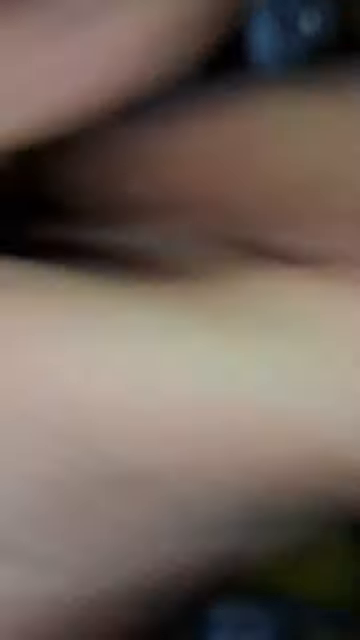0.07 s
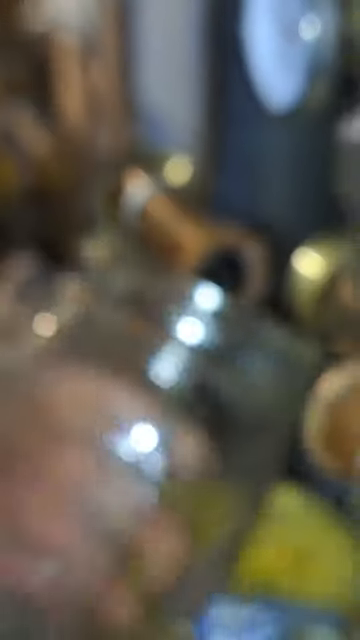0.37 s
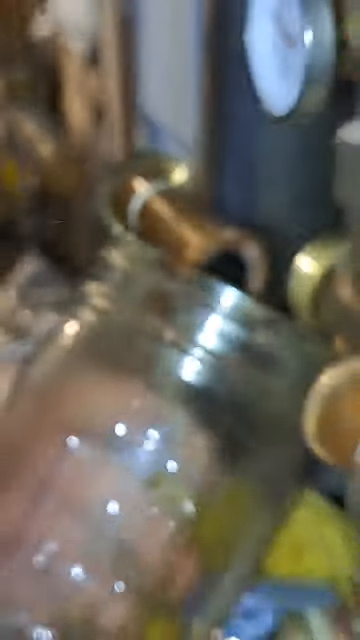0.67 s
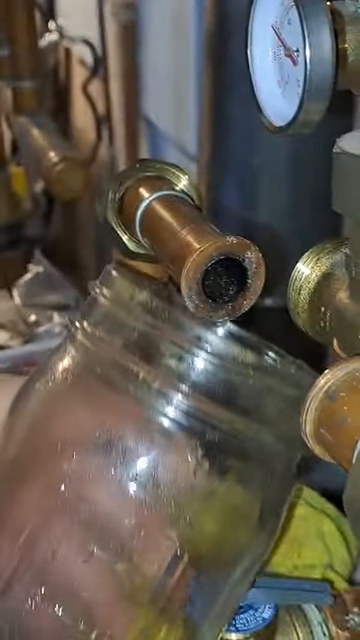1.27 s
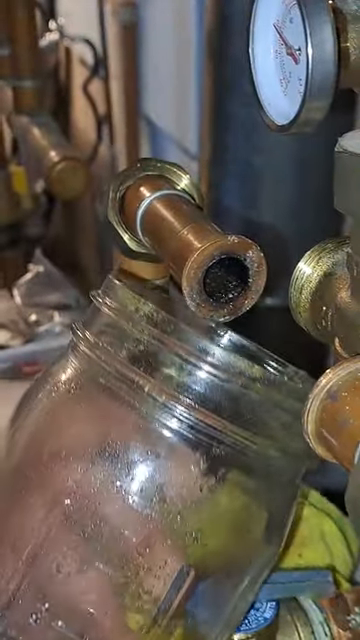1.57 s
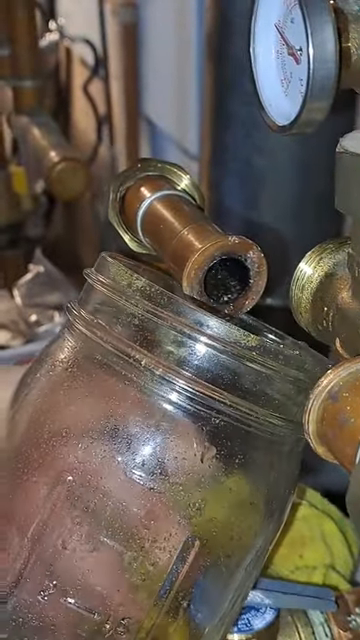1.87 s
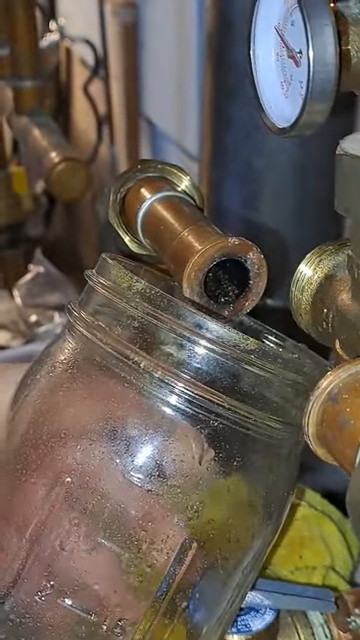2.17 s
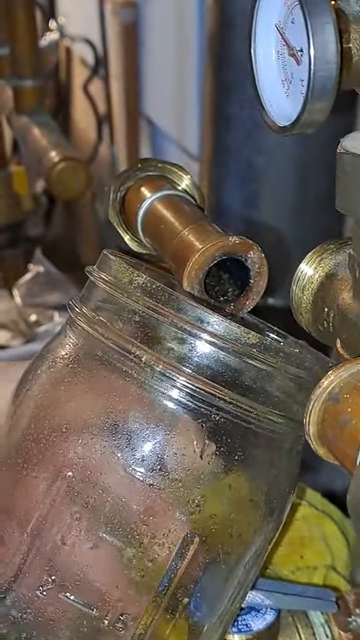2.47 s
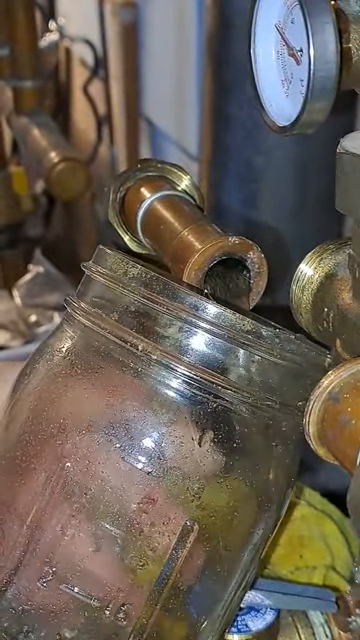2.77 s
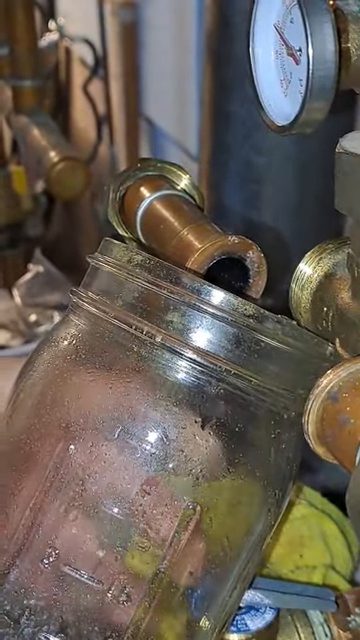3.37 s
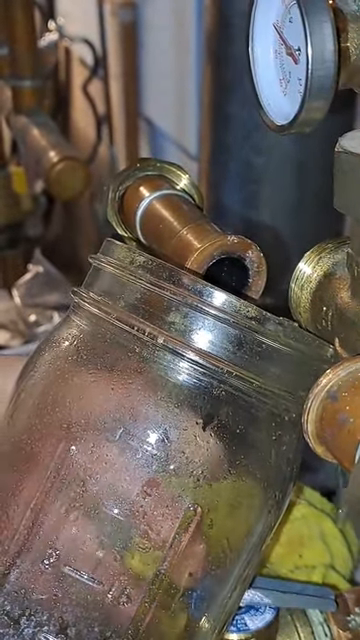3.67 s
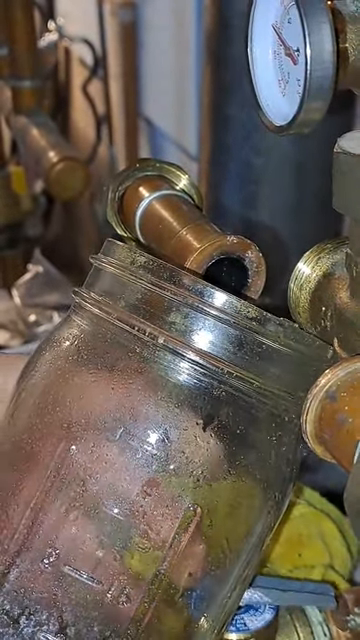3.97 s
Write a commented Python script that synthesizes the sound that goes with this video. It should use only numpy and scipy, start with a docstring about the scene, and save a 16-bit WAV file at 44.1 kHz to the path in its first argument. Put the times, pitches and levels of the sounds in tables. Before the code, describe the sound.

A glass jar knocks against fittings, then a pipe sputters air and water into it.

```python
"""A hand-held glass jar knocks and ticks against pipe fittings, on a stereo pair in a small humming room.
After about two seconds, air and water spit into it from an open copper pipe. A spurt starts as a hiss,
then gurgles as slugs of water close and open the pipe's mouth. The first dies away in a sputter and
a few drops; another breaks out just at the end."""
import sys
import numpy as np
from scipy import signal
from scipy.fft import rfft, irfft
from scipy.io import wavfile

SR = 44100
rng = np.random.default_rng(int(sys.argv[2]) if len(sys.argv) > 2 else 0)


def inscribe(sig):
    """Save sig as 16-bit PCM at rate SR to the path in sys.argv[1].

    A 1-D sig is mono; a 2-D sig holds one channel per row.
    Samples are clipped to [-1, 1] before scaling.
    """
    pcm = np.round(np.clip(np.atleast_2d(sig).T, -1, 1) * 32767)
    wavfile.write(sys.argv[1], SR, pcm.astype(np.int16))


N = 176400
T = np.arange(N) / SR
HZ = np.fft.rfftfreq(N, 1 / SR) + 1

# slugs of water bursting at the pipe's mouth: start_s, length_s, level_db, pocket_from_hz, pocket_to_hz
WATER_SLUGS = [(2.241, 0.016, -39.5, 2890, 2190), (2.275, 0.075, -43, 1630, 1580),
               (2.333, 0.029, -30.5, 1300, 905), (2.397, 0.036, -31.5, 1003, 1230),
               (2.471, 0.025, -31.5, 880, 1620), (2.493, 0.078, -32.5, 1630, 1540),
               (2.755, 0.085, -56, 1604, 1493), (2.874, 0.024, -49, 806, 1250),
               (3.912, 0.018, -29.5, 1100, 1090), (3.961, 0.016, -20.5, 2100, 1670),
               (3.992, .03, -31, 1090, 1000)]
# spurts of air and water: start_s, length_s, hiss_db, churn_db, whistle_re_hiss_db, crackle_depth_db
PIPE_SPURTS = [(2.252, .32, -39.5, -36, -9, 14), (2.76, 0.12, -45, -49.5, -17, 3.5),
               (3.894, 0.03, -28.5, -24.5, -10.5, 6)]
# whistling resonances of the pipe: pitch_hz, width_hz, gain_db
PIPE_WHISTLES = [(5870, 230, -10), (7780, 300, 1.5), (13550, 450, -1.5)]
# tone of the splash, the escaping air and the churning water: frequency_hz, gain_db
SPLASH_SPECTRUM = [(330, -14.5), (850, -2), (1200, 11.5), (1880, -4.5), (2700, -1.5), (9000, -39)]
HISS_SPECTRUM = [(900, -5), (2600, -4), (5500, -7.5), (9000, -13.5), (15000, -5.5)]
CHURN_SPECTRUM = [(30, -42), (63, -7), (148, -1), (330, -8.5), (800, -32)]
# puffs, seeping air and soft sloshes at the mouth: start_s, length_s, level_db, centre_hz
MOUTH_PUFFS = [(0, 1, -62, 10300), (1.13, 0.74, -65.5, 5500), (2.2, 0.14, -39.5, 10600),
               (2.239, 0.035, -19, 4440), (2.79, 0.23, -45.5, 415), (3.05, 0.84, -68.5, 4900),
               (3.876, 0.27, -30, 2620), (3.922, 0.15, -29, 370)]
# drops landing on the glass: start_s, level_db, pitch_hz
WATER_DROPS = [(2.802, -48, 4040), (2.839, -39, 3480), (2.874, -37, 5390), (2.909, -29, 3180),
               (2.927, -42, 5990), (2.957, -39, 3580), (3.0, -38, 3440)]
# jar against the pipework: start_s, boom_db, body_db, clack_db, ring_db
JAR_KNOCKS = [(0.056, -58, -34, -36.5, -47), (0.67, -50.5, -37, -32.5, -49), (0.960, -35, -33, -31.5, -40),
              (0.973, -34.5, -33.5, -27, -52), (1.886, -54.5, -49, -45.5, -72.5),
              (3.185, -42, -54, -49, -65)]
# boom, body, clack and ring of a knock: low_hz, high_hz, rise_s, hard_rattle_t60_s, mode_share
KNOCK_PARTS = [(69, 406, 0.021, 0.56, 0.65), (295, 900, 0.016, 0.37, 0.61), (910, 2160, 0.00067, 0.32, 0.9),
               (2500, 10300, 0.00085, 0.32, 0.61)]
# modes of the glass: pitch_hz, gain_db, t60_s
JAR_MODES = [(507, 6.5, 0.18), (789, 1, 0.26), (1556, 4, 0.042), (1988, 8, 0.066), (4090, -3, 0.33),
             (4974, -4.5, 0.37), (6880, 1.5, 0.12), (7590, 3.5, 0.11)]
# ticks of glass and fittings: start_s, level_db, centre_hz
GLASS_TICKS = [(0.201, -36.5, 4760), (0.244, -37, 3080), (0.734, -45, 4200), (0.82, -52, 3570),
               (1.679, -49, 4970), (3.03, -46, 12400), (3.678, -57.5, 4560)]
# soft bumps of the hand: start_s, level_db
HAND_BUMPS = [(0.983, -33.5), (1.723, -49), (2.75, -40), (3.679, -43)]
# the hand shifting its grip: start_s, length_s, level_db, centre_hz
GRIP_RUBS = [(0, 0.6, -53, 122), (0.19, 0.28, -47, 462), (1.101, 0.48, -51, 131.4),
             (3.528, 0.36, -54.5, 132)]
# room tone: frequency_hz, gain_db
ROOM_SPECTRUM = [(30, -3), (70, 0.5), (550, -8), (1000, -3.5), (1950, -2), (2450, -21), (7650, -29),
                 (15500, -30.5)]
# how the sounds at the jar sit between the microphones: frequency_hz, left_minus_right_db
MIC_BALANCE = [(800, 2), (2700, -1.5), (6400, -6), (10000, -1)]

MICS_APART_HZ = 880  # above this the two microphones hear mostly unrelated noise


def gurgle():
    """Each slug splashes, sheds bubbles and rings an air pocket that glides as it opens or closes."""
    powers = np.array([amp(db) * surge(start, length, rise=0.012, t60=0.077)
                       for start, length, db, _, _ in WATER_SLUGS]) ** 2 + 1e-30
    glides = [np.interp(T, [start, start + length], [from_hz, to_hz])
              for start, length, _, from_hz, to_hz in WATER_SLUGS]
    pocket_hz = np.average(glides, axis=0, weights=powers)
    bursts = flutter(rate_hz=120, depth_db=5)
    pocket = resonate(white() * bursts, pocket_hz, width_hz=210)
    splash = shaped(white() * bursts, amp(curve(SPLASH_SPECTRUM)))
    return np.sqrt(powers.sum(0)) * (pocket + amp(-4) * splash + amp(-3) * bubbles())


def bubbles(sizes=24, per_s=450, decay_cycles=8, glide=.05):
    """Bubbles of many sizes, torn off by the slugs, each rise in pitch as they die."""
    out = np.zeros(N)
    for hz in np.geomspace(560, 1750, sizes):
        age = hz * T[:SR // 20] / decay_cycles
        ring = np.sin(2 * np.pi * decay_cycles * age * (1 + glide * age)) * np.exp(-age)
        births = white() * (rng.random(N) < per_s / sizes / SR)
        out += signal.oaconvolve(births, ring)[:N]
    return unit_rms(out)


def hiss():
    """Escaping air whistles unsteadily in the pipe and crackles with spray."""
    gusts = flutter(rate_hz=45, depth_db=2)
    bend = gusts ** 0.022  # stronger gusts whistle slightly higher
    whistles = gusts * sum(amp(db) * resonate(white(), hz * bend, width)
                           for hz, width, db in PIPE_WHISTLES)
    out = np.zeros(N)
    for start, length, db, _, whistle_db, crackle_db in PIPE_SPURTS:
        spray = shaped(white() * flutter(rate_hz=170, depth_db=crackle_db), amp(curve(HISS_SPECTRUM)))
        level = amp(db) * surge(start, length, rise=0.0245, t60=0.41)
        out += level * (spray + amp(whistle_db) * whistles)
    return out


def churn(lag_s=0.076):
    """The low churning of water follows each spurt a moment later."""
    level = sum(amp(db) * surge(start + lag_s, length - lag_s, rise=0.049, t60=0.4)
                for start, length, _, db, _, _ in PIPE_SPURTS)
    return level * shaped(stereo_noise(), amp(curve(CHURN_SPECTRUM)))


def drops():
    """A drop slaps the glass and rings briefly."""
    out = np.zeros((2, N))
    for start, db, hz in WATER_DROPS:
        slap = amp(-3) * noise_band(hz, octaves=.7)
        add(out, start, amp(db) * (tone(hz) + slap) * strike(T, rise=0.001, t60=0.027))
    return out


def knocks(hard_boom_db=-33.5, trim_db=0.5):
    """Each knock rings the jar's modes over a dense rattle of pipework; the low parts swell later."""
    out, t = np.zeros((2, N)), T[:SR // 2]
    for part, (low, high, rise, t60, mode_share) in enumerate(KNOCK_PARTS):
        pipework = shaped(stereo_noise(), 1 / (1 + (low / HZ) ** 6) / (1 + (HZ / high) ** 6))
        modes = [mode for mode in JAR_MODES if low < mode[0] < high]
        for start, *levels_db in JAR_KNOCKS:
            ring = glass_ring(t, modes, rise)
            stretch = amp(.17 * (levels_db[0] - hard_boom_db))  # softer knocks rattle for less long
            rattle = np.roll(pipework, rng.integers(N), 1)[:, :len(t)] * strike(t, rise, t60 * stretch)
            knock = np.sqrt(mode_share) * ring + np.sqrt(1 - mode_share) * rattle
            add(out, start, amp(levels_db[part] + trim_db) * knock)
    return out


def glass_ring(t, modes, rise):
    """The struck jar's modes die away, each reaching the two microphones at different phases."""
    total_rms = np.sqrt(sum(amp(db) ** 2 for _, db, _ in modes) / 2)
    out = np.zeros((2, len(t)))
    for hz, db, t60 in modes:
        cycles = hz * t + rng.random()
        mic_offset = rng.random((2, 1)) * min(hz / MICS_APART_HZ / 2, 1)
        out += amp(db) / total_rms * strike(t, rise, t60) * np.sin(2 * np.pi * (cycles + mic_offset))
    return out


def ticks(octaves=0.92):
    """Short bright cracks of glass on metal, each with a duller body and the ping of a fitting."""
    out = np.zeros((2, N))
    ping = amp(-54.5) * tone(hz=3500) * strike(T, rise=0.003, t60=0.035)
    for start, db, hz in GLASS_TICKS:
        crack = noise_band(hz, octaves) + .5 * noise_band(hz / 2, octaves)
        add(out, start, amp(db) * crack * strike(T, rise=0.0034, t60=0.041) + ping)
    return out


def handling(bump_hz=65.2):
    """Dull bumps and soft rubbing, from the hand that holds the jar."""
    out = swishes(GRIP_RUBS, octaves=0.56)
    for start, db in HAND_BUMPS:
        thud = tone(bump_hz) + .5 * noise_band(2 * bump_hz, octaves=0.27)
        add(out, start, amp(db) * thud * strike(T, rise=0.016, t60=0.38))
    return out


def room_tone():
    """Steady machine hum behind everything: a broad rush and one narrow band."""
    rush = amp(-61.5) * shaped(stereo_noise(), amp(curve(ROOM_SPECTRUM)))
    return rush + amp(-71) * resonate(stereo_noise(), hz=1004, width_hz=45)


def room(x, wet_db):
    """The near, hard walls add a short tail to the direct sound."""
    return x + amp(wet_db) * echoes(x, t60=.24)


def echoes(x, t60):
    """Dense reflections, a different pattern at each microphone."""
    tail = (stereo_noise() * strike(T, 1 / SR, t60))[:, :SR // 2]
    return signal.fftconvolve(np.atleast_2d(x), tail / np.linalg.norm(tail[0]), axes=1)[:, :N]


def swishes(rows, octaves):
    """Soft strokes of noise that swell quickly and fade."""
    out = np.zeros((2, N))
    for start, length, db, hz in rows:
        envelope = np.minimum(T / 0.022, 1) ** 2 * np.clip(1 - T / length, 0, 1)
        add(out, start, amp(db) * noise_band(hz, octaves) * envelope)
    return out


def stereo_noise():
    """White noise at two microphones: alike in the bass, unrelated in the treble."""
    a, b = rfft(rng.standard_normal((2, N)))
    coherence = 0.94 / (1 + (HZ / MICS_APART_HZ) ** 2)
    mid, side = a * np.sqrt(1 + coherence), b * np.sqrt(1 - coherence)
    return unit_rms(irfft([mid + side, mid - side], N))


def white():
    """Noise from a single point."""
    return rng.standard_normal(N)


def tone(hz):
    """A steady sine."""
    return np.sin(2 * np.pi * hz * T)


def noise_band(hz, octaves):
    """Stereo noise in a bell-shaped band."""
    return shaped(stereo_noise(), np.exp(-.5 * (np.log2(HZ / hz) / octaves) ** 2))


def flutter(rate_hz, depth_db):
    """A randomly wavering gain with its peaks capped."""
    wander = shaped(white(), np.exp(-(HZ / rate_hz) ** 2))
    return unit_rms(amp(depth_db * np.minimum(wander, 2)))


def resonate(x, hz, width_hz):
    """A steep resonance that follows a pitch."""
    carrier = np.exp(2j * np.pi * np.cumsum(hz * np.ones(N)) / SR)
    pole = np.exp(-np.pi * width_hz / SR)
    return unit_rms((carrier * signal.lfilter([1], [1, -2 * pole, pole * pole], x / carrier)).real)


def strike(t, rise, t60):
    """An envelope that rises to 1 and dies away; times in seconds."""
    return np.minimum(t / rise, 1) * np.exp(-np.log(1000) * np.maximum(t - rise, 0) / t60)


def surge(start, length, rise, t60):
    """An envelope that swells 20 dB per rise time up to its start, holds and dies away."""
    swell = 10 ** (np.minimum(T - start, 0) / rise)
    return swell * np.exp(-np.log(1000) * np.maximum(T - start - length, 0) / t60)


def curve(points):
    """A spectrum's value at every frequency."""
    hz, value = np.transpose(points)
    return np.interp(np.log(HZ), np.log(hz), value)


def shaped(x, gain):
    """Filters by a gain per frequency, to rms 1."""
    return unit_rms(irfft(rfft(x) * gain, N))


def unit_rms(x):
    """Scales to rms 1."""
    return x / np.sqrt(np.mean(x ** 2) + 1e-20)


def amp(db):
    """Decibels to gain."""
    return 10 ** (np.asarray(db) / 20)


def add(mix, start_s, sound):
    """Mixes a sound in at a time."""
    part = mix[:, max(round(start_s * SR), 0):][:, :sound.shape[1]]
    part += sound[:, :part.shape[1]]


def scene():
    """The water reaches the microphones by way of the jar's glass walls, then the room."""
    in_jar = echoes(gurgle() + hiss(), t60=.045)
    at_jar = room(in_jar, wet_db=-10.5) + swishes(MOUTH_PUFFS, octaves=0.98)
    at_jar += room(ticks() + drops(), wet_db=-5)
    mic_gains = amp(curve(MIC_BALANCE) * np.array([[.5], [-.5]]))
    at_mics = irfft(rfft(at_jar) * mic_gains, N)
    return at_mics + churn() + room(knocks(), wet_db=-9) + handling() + room_tone()


def record(dry):
    """The recorder's band limit, at 15.9 kHz."""
    lowpass = signal.firwin(511, 15900, window=("kaiser", 9), fs=SR)
    return signal.oaconvolve(dry, lowpass[None], "same")


dry = scene()
out = record(dry)
inscribe(out)
```